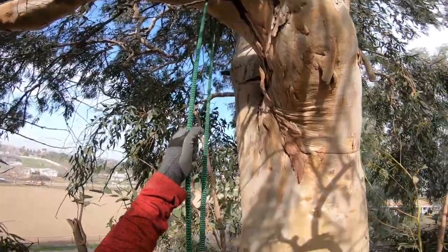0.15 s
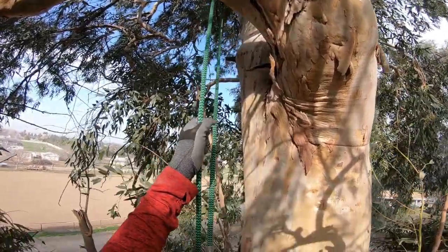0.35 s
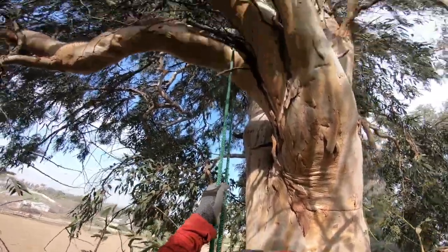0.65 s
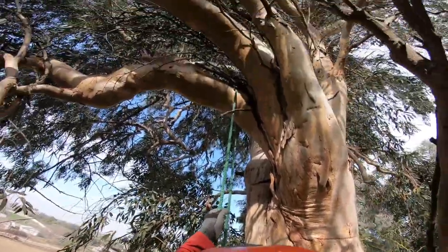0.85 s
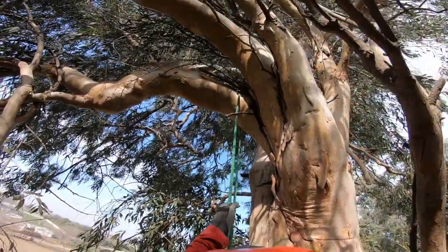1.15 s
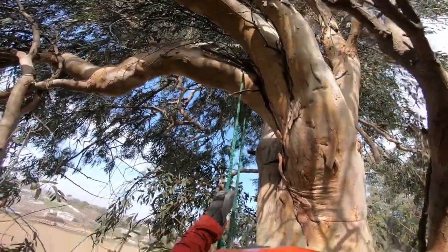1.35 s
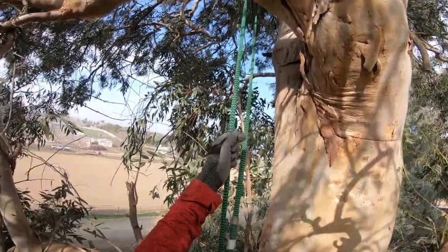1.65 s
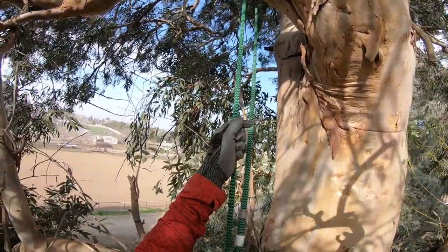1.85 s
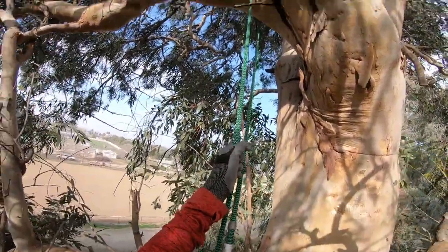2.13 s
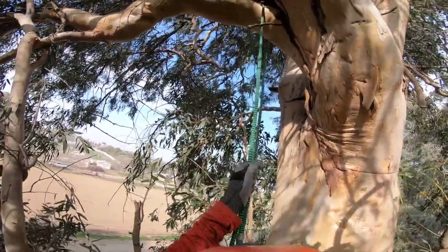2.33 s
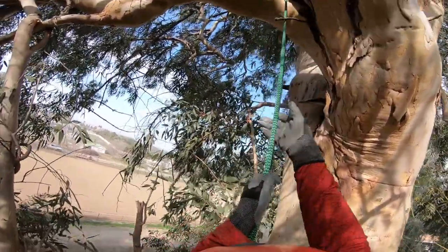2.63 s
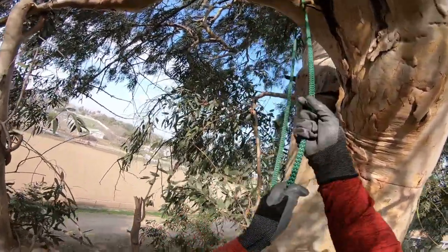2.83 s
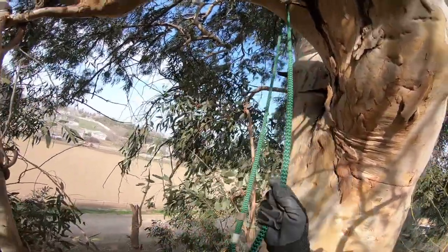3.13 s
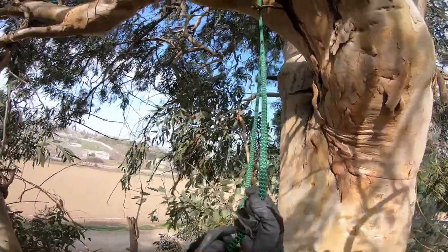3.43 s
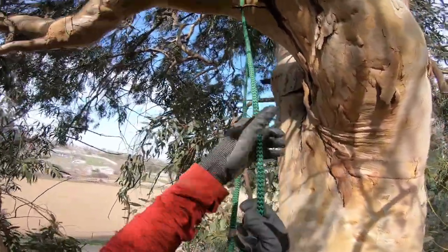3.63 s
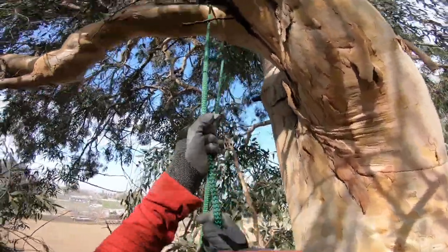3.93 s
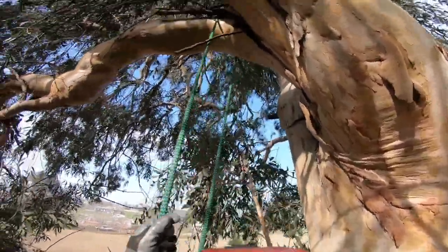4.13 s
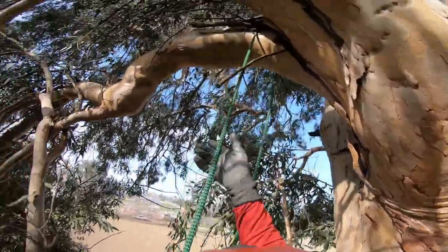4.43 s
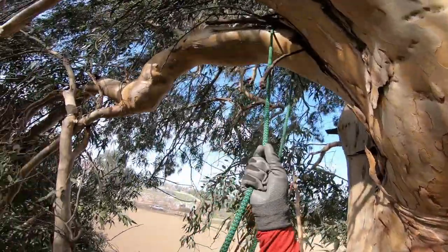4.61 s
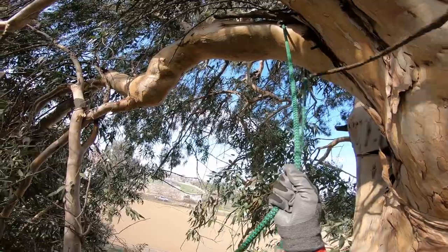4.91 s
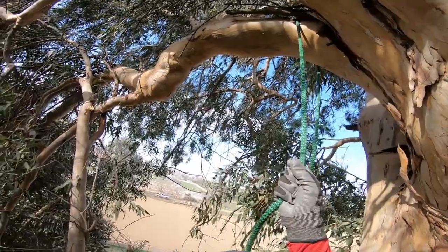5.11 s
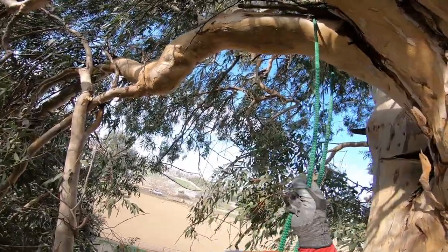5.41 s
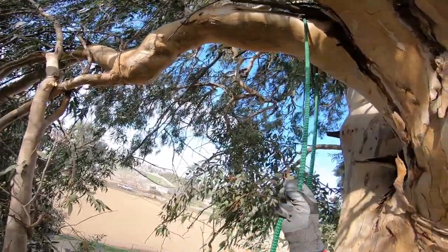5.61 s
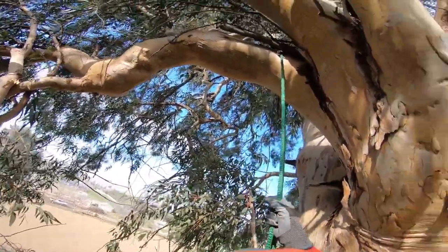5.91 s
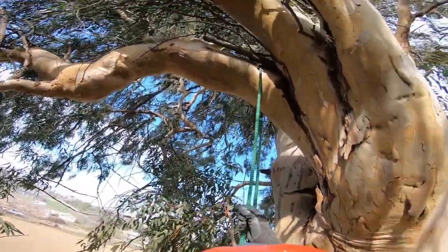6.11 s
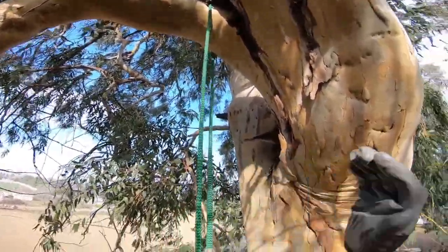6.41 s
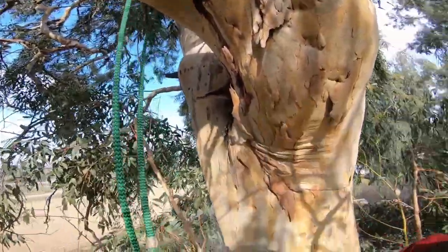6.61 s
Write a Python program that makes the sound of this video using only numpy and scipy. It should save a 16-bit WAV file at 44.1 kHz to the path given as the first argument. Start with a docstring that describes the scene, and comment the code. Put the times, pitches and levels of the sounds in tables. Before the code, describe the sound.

Outdoors, high in a tree, heard from a helmet microphone. A far engine drones throughout, low and slightly wavering, sagging a touch around 3.5 s, over a soft wash of open air. Rope rustles at once; from 0.3 to 0.75 s come coarse glove scrapes, short rasps and quick metal clicks. Then it is calmer: light rubbing, a soft wind thump at 1.1 s and a deeper one near 1.5 s, clicks around 1.6 s and thin, faint rising whistles to 1.9 s. Small ticks scatter from 2.4 to 4 s, with a low thump at 3.66 s. A dense rattle of rope and carabiner follows at 4.1-4.45 s, then a bright clack at 4.8 s. At 5.13 s a hard knock overloads the sound; everything drops and slowly recovers. A strong jerk and clack lands at 5.5 s, then sparse clicks, rustles and a wind thump at 6.6 s, the drone continuing to the end at about 6.8 s.

```python
"""A far engine drones over an open-air wash, and close by a rope jerks at once: rustle of glove and rope.
Place: high in a tree, where a climber works the rope; microphone: a helmet camera with two ports.
The drone is a sum of shaft orders, wash and rustle are shaped noise, metal hardware clicks as decaying modes.
Rasps, wind thumps on the ports and thin far whistles join in. Late on, a hard knock on the housing overloads
the camera, whose gain control drops the whole scene and lets it creep back."""
import sys
import numpy as np
from scipy import signal
from scipy.fft import rfft, irfft
from scipy.io import wavfile
from scipy.ndimage import uniform_filter1d

SR = 44100
rng = np.random.default_rng(int(sys.argv[2]) if len(sys.argv) > 2 else 0)


def to_wav(sig):
    """Store sig (one row per channel, or 1-D mono) as 16-bit WAV at the path in sys.argv[1].

    Samples outside -1..1 are clipped; the rate is SR.
    """
    pcm = np.clip(np.atleast_2d(sig), -1, 1) * 32767
    pcm = np.round(pcm).astype(np.int16)
    wavfile.write(sys.argv[1], SR, pcm.T)  # frames by channels


N = 298027  # samples


def undb(db):
    """Amplitude factor of a level in dB."""
    return 10 ** (np.asarray(db) / 20)


def curves(table):
    """Columns of a time table, one value per sample."""
    s, *columns = np.transpose(table)
    return [np.interp(np.arange(N) / SR, s, c) for c in columns]


def log_interp(hz, table, column):
    """Read a column of a frequency table, its points joined on a log axis."""
    table = np.array(table)
    return np.interp(np.log(hz), np.log(table[:, 0]), table[:, column])


def colour(x, table, column=1):
    """Filter by (f/Hz, level/dB) points."""
    hz = np.arange(len(x) // 2 + 1) * SR / len(x) + 1  # 1 Hz up, to avoid log of zero
    return irfft(rfft(x) * undb(log_interp(hz, table, column)), len(x))


def band(x, hz, width_hz):
    """Steep band-pass around hz: one resonance applied twice."""
    b, a = signal.iirpeak(hz, hz / width_hz, SR)
    return signal.lfilter(b, a, signal.lfilter(b, a, x))


def unit(x):
    """Scale to an RMS of one."""
    return x / np.sqrt(np.mean(x ** 2))


def walk(rate):
    """Random levels held 1 / rate s and slewed twice; spread near 1."""
    hold = int(SR / rate)
    steps = np.repeat(rng.standard_normal(N // hold + 1), hold)
    return 1.606 * uniform_filter1d(uniform_filter1d(steps, hold), hold)[:N]


def ring(hz, t60, rise, phase=0):
    """A quarter second of a struck mode: quick rise, exponential decay of a sine."""
    t = np.arange(SR // 4) / SR
    envelope = (1 - np.exp(-t / rise)) * np.exp(-np.log(1000) * t / t60)
    return envelope * np.sin(2 * np.pi * hz * t + phase)


def slips(rate, spread_db, decay_s, floor):
    """Sudden slips at random moments (rate per second), each dying away, over a steady rub."""
    kicks = (rng.random(N) < rate / SR) * undb(spread_db * rng.standard_normal(N))
    return floor + signal.lfilter([1], [1, -np.exp(-1 / (decay_s * SR))], kicks)


def add(track, s, sound):
    """Mix a sound in at time s."""
    i = int(s * SR)
    track[..., i:i + sound.shape[-1]] += sound[..., :N - i]


# left microphone port against right: f/Hz, level/dB, likeness/0-1
PORT_BALANCE = [(60, 0, 0.97), (201, -0.5, 1), (357, 1.5, 0.93), (594, -3.5, 0.69), (927, -8.5, 0.3),
                (1500, -10, 0.26), (3140, -5, 0), (4970, -1.5, 0.4), (8100, -4, 0), (15000, -2.5, 0)]
LEFT_LAG_S = 0.00022


def ports(right, twin):
    """Left hears the right signal late and shaded, blended with a twin signal where likeness falls."""
    hz = np.arange(N // 2 + 1) * SR / N + 1
    alike = np.clip(log_interp(hz, PORT_BALANCE, 2), 0, 1)
    late = rfft(right) * np.exp(-2j * np.pi * hz * LEFT_LAG_S)
    left = alike * late + np.sqrt(1 - alike ** 2) * rfft(twin)
    return np.array([colour(irfft(left, N), PORT_BALANCE), right])


# far engine speed, sagging once under load: t/s, shaft rate f/Hz
SHAFT_RATE = [(0, 19.9), (0.3, 19.9), (0.5, 19.78), (2.3, 19.77), (3.0, 19.72), (3.5, 19.53), (3.75, 19.58),
              (4.25, 19.85), (4.75, 19.77), (5.9, 19.71), (6.76, 19.76)]
# strong orders fade in and out on the way: t/s, order 10 level/dB, order 20 level/dB, order 21 level/dB
STRONG_ORDERS = [(0, -42, -36.5, -54), (0.3, -36.5, -36, -47.5), (0.8, -37.5, -41.5, -54.5),
                 (1.6, -38.5, -40.5, -60), (2.1, -39, -36.5, -49.5), (2.5, -38, -43.5, -58),
                 (2.95, -37.5, -41.5, -51), (3.45, -53.5, -43, -47.5), (3.75, -39, -41.5, -47.5),
                 (4.1, -47, -38, -45), (4.5, -36.5, -39, -44), (4.8, -40.5, -37, -53.5),
                 (5.4, -41.5, -36.5, -42.5), (5.9, -46, -39.5, -47), (6.76, -43, -36, -44.5)]
# faint orders without slow fades: multiple of shaft rate, level/dB
FAINT_ORDERS = [(8, -57), (11, -55), (12, -59), (19, -56), (30, -52), (31, -59), (40, -56.5)]
LOW_HUM_HZ, LOW_HUM_DB = 79.94, -44.5  # centres of a wandering pitch and level


def drone():
    """Far engine: shaft orders in step, each wavering a little on the way through the air, and a low hum."""
    shaft_hz, = curves(SHAFT_RATE)
    db10, db20, db21 = curves(STRONG_ORDERS)
    turn = 2 * np.pi * np.cumsum(shaft_hz) / SR
    hum_level = undb(LOW_HUM_DB + 2.24 * walk(9))
    hum_hz = LOW_HUM_HZ + 1.05 * walk(6)
    out = hum_level * np.sin(2 * np.pi * np.cumsum(hum_hz) / SR)
    for order, db in [(10, db10), (20, db20), (21, db21)] + FAINT_ORDERS:
        # orders line up into one pressure pulse; higher ones waver more in level
        level = undb(db + (.8 + 0.03 * order) * walk(9))
        out += level * np.cos(round(order) * turn + .3 * walk(8))
    return ports(np.sqrt(2) * out, np.zeros(N))  # sqrt(2) makes the levels RMS


# open-air wash of engine, fields and leaves at the right port: f/Hz, level/dB per Hz
WASH_SPECTRUM = [(32, -66), (50, -61.5), (90, -63), (160, -65), (300, -72.5), (550, -72.5), (850, -71.5),
                 (1300, -72), (2200, -78), (3500, -92), (6000, -100), (8500, -94), (10500, -107.5),
                 (15000, -110)]
# slow drift of the wash, perhaps as the head turns: t/s, bass level/dB, middle level/dB
HEAD_DRIFT = [(0, 1.5, -0.5), (1.3, 0, 0.5), (2.3, -1, -1), (3.3, -1, 0), (4.6, -2, 1.5), (5.5, -2, 0),
              (6.2, 1.5, 0), (6.76, 0, 4)]


def wash():
    """Half-octave bands of far noise that swell and flicker on their own."""
    pair = np.zeros((2, N))
    bass_db, middle_db = curves(HEAD_DRIFT)
    hz = np.arange(N // 2 + 1) * SR / N
    for lo in 25 * 2 ** np.arange(0, 10, .5):
        inside = (hz >= lo) & (hz < lo * np.sqrt(2))
        noise = irfft(rfft(rng.standard_normal((2, N))) * inside, N)
        # the middle drift is strongest at 1700 Hz
        drift_db = bass_db if lo < 150 else middle_db * np.exp(-np.log2(lo / 1700) ** 2)
        pair += noise * undb(drift_db + .9 * walk(1.6) + .9 * walk(12))
    # white noise scaled to unit power per Hz takes the spectrum
    return ports(*(colour(v * np.sqrt(SR / 2), WASH_SPECTRUM) for v in pair))


# strokes of glove or sleeve that swell and fade: start t/s, length t/s, hiss level/dB, scrape level/dB
GLOVE_STROKES = [(0.132, 0.15, -55, -49), (0.279, 0.18, -41, -33), (0.418, 0.22, -41, -38),
                 (0.53, 0.16, -36.5, -31), (0.648, 0.15, -45.5, -56), (0.75, 0.34, -51.5, -65),
                 (1.012, 0.27, -50, -53), (1.539, 0.12, -48.5, -40.5), (1.993, .13, -52, -48),
                 (2.502, 0.6, -54, -54), (2.894, 0.4, -46.5, -49), (3.219, 0.25, -43, -43),
                 (3.435, 0.055, -47, -50), (3.662, 0.03, -48, -47), (3.729, 0.038, -51, -41),
                 (3.47, 0.35, -53.5, -47), (3.95, 0.3, -50.5, -47), (3.772, 0.2, -48.5, -42),
                 (4.188, 0.071, -30.5, -34), (4.231, 0.21, -37.5, -40.5), (4.457, 0.23, -52.5, -49),
                 (4.683, 0.16, -51.5, -47), (5.266, 0.14, -47, -51), (5.6, 0.24, -55, -51),
                 (6.043, 0.42, -46, -46.5), (6.151, 0.08, -38.5, -45), (6.532, 0.13, -70, -50),
                 (6.544, 0.27, -49, -65)]
STROKE_PEAK = 0.42  # share of the length at which a stroke is loudest
# jerks of the rope that start at once and die away: t/s, hiss level/dB, scrape level/dB
ROPE_JERKS = [(0.001, -45.5, -44), (0.294, -39, -32), (0.547, -37, -32), (0.697, -37, -38.5),
              (4.086, -36, -47), (4.794, -21.5, -56), (4.89, -38, -57), (4.987, -33, -62),
              (5.053, -31, -55.5), (5.113, -34, -32.5), (5.28, -39, -51), (5.4925, -20, -26),
              (5.782, -47.5, -38), (5.898, -42, -47)]
# time for a jerk to fall by 60 dB: hiss t/s, scrape t/s
JERK_DECAY = [0.19, 0.23]
JERK_RISE_S = 0.00058
# the rope never lies quite still
IDLE_HISS_DB, IDLE_SCRAPE_DB = -61.5, -53


def handling():
    """Gains of hiss and scrape: a restless floor, swelling strokes and sudden jerks add as power."""
    power = undb([[IDLE_HISS_DB], [IDLE_SCRAPE_DB]] + 0.65 * walk(8.0)) ** 2
    bend = np.log(.5) / np.log(STROKE_PEAK)  # puts the sine's crest at the peak
    for start, length, *db in GLOVE_STROKES:
        part = np.linspace(0, 1, int(length * SR))
        swell = np.abs(np.sin(np.pi * part ** bend)) ** 1.18
        add(power, start, np.outer(undb(db), swell) ** 2)
    t = np.arange(SR // 2) / SR
    for s, *db in ROPE_JERKS:
        decay = np.exp(-np.log(1000) * t / np.array(JERK_DECAY)[:, None])
        fade = (1 - np.exp(-t / JERK_RISE_S)) * decay
        add(power, s, (undb(db)[:, None] * fade) ** 2)
    return np.sqrt(power)


# bright close sounds through the microphone port cavity: f/Hz, relative level/dB
CAVITY_RESPONSE = [(1500, -13.5), (3000, -3), (5000, 1), (7000, 5.5), (8500, 7.5), (9800, 0), (11500, -6.5),
                   (15500, -4)]
# resonances of the scrape in the glove: f/Hz, width f/Hz, relative level/dB
SCRAPE_BANDS = [(2380, 2240, 8.5), (1670, 430, 9), (2620, 400, 2), (1277, 510, 7.5)]


def rustle():
    """Fibres slip in uneven grains: a close hiss through the port cavity and a coarser scrape in the glove."""
    hiss_gain, scrape_gain = handling()
    grains = slips(140, 3.5, .002, 1.6)
    hiss = np.array([unit(colour(v * grains, CAVITY_RESPONSE)) for v in rng.standard_normal((2, N))])
    scrape = np.zeros((2, N))
    for hz, width_hz, db in SCRAPE_BANDS:
        coarse = grains + slips(70, 5.5, .004, .1)
        scrape += undb(db) * band(rng.standard_normal((2, N)) * coarse, hz, width_hz)
    return ports(*(hiss * hiss_gain + unit(scrape) * scrape_gain))


# hardware clicks: t/s, metal level/dB, metal f/Hz, body level/dB, body f/Hz, left minus right level/dB
HARDWARE_CLICKS = [(0.3, -32, 3000, -22, 1350, -24), (0.339, -22, 7100, -25, 567, -33),
                   (0.4673, -43, 2810, -29, 2780, -20), (0.499, -37, 2800, -23, 2660, -30),
                   (0.5295, -31, 8100, -42, 2600, -12), (0.5483, -33, 4730, -22, 1810, -25),
                   (0.578, -31, 8200, -40, 2600, -10), (0.596, -23, 3200, -20, 1410, -33),
                   (0.63, -25.5, 7300, -30, 2720, -17), (0.643, -33, 3350, -17, 1880, -23),
                   (0.702, -36, 6400, -26, 1320, -12), (1.5673, -37.5, 5600, -31, 846, -5),
                   (1.572, -35, 4400, -45, 835, -12), (1.602, -33.5, 4700, -36, 515, -10),
                   (2.403, -54, 3040, -30, 1360, -22), (2.6433, -41.5, 3200, -34, 605, -0.5),
                   (2.72, -43, 2950, -34, 520, -11), (2.731, -36.5, 4700, -43, 895, -8),
                   (2.8364, -27.5, 6700, -24.5, 3780, -2), (3.036, -41, 6400, -48, 900, -1),
                   (3.12, -30, 4340, -36, 820, -4), (3.2166, -42, 4300, -28.5, 990, -8),
                   (3.239, -36, 4730, -30, 2400, -2.5), (3.2632, -34, 2980, -33, 950, -2.5),
                   (3.276, -37, 9700, -35, 965, -6), (3.322, -27.5, 6440, -33, 820, -9),
                   (3.331, -35, 3440, -36, 1510, -5), (3.351, -37, 8200, -30, 2500, -5.5),
                   (3.389, -36.5, 6620, -43, 534, 1), (3.46, -40, 5500, -38, 900, -8),
                   (3.5719, -49, 3200, -21.5, 775, -7.5), (3.587, -29, 2850, -41, 2490, -5),
                   (3.6524, -33, 4730, -32, 1880, -12), (3.706, -34.5, 4730, -32, 925, -11),
                   (3.825, -28, 5100, -32, 990, -7), (3.8562, -64, 3140, -24.5, 670, -16),
                   (3.901, -50, 4000, -27.5, 1530, -4.5), (3.962, -42, 4700, -50, 900, -8),
                   (4.0905, -29.5, 8000, -19, 1070, -17), (4.197, -41, 2200, -21, 775, -20),
                   (4.2015, -43, 2970, -19, 800, -15), (4.2063, -16.5, 8900, -16, 624, -9.5),
                   (4.228, -22, 4670, -16.5, 980, -11), (4.2325, -28, 8700, -42, 990, -6),
                   (4.2598, -18, 9300, -22.5, 1260, -12), (4.2825, -40, 4020, -24, 1210, -13),
                   (4.2856, -33, 8440, -20.5, 744, -6.5), (4.299, -30, 7000, -24, 1220, -19),
                   (4.324, -42, 8200, -26.5, 790, -13), (4.345, -29, 8820, -28, 547, -22),
                   (4.3865, -28, 8040, -42, 530, -14), (4.416, -35, 4750, -43, 1120, -10),
                   (4.4536, -31.5, 2970, -28.5, 1416, 0), (4.7249, -32, 4640, -23.5, 800, -27.5),
                   (4.7918, -11.5, 3420, -20.5, 2175, 2), (4.7926, -11.5, 7450, -22.5, 2170, 0.5),
                   (4.8898, -24, 3970, -22, 570, -1.5), (4.989, -41, 8100, -42, 630, -22),
                   (5.0538, -24.5, 7540, -32, 1570, -13), (5.1153, -28.5, 8050, -19.5, 784, -9),
                   (5.301, -19.5, 2950, -20, 1880, -9), (5.3303, -30, 7930, -26, 685, -18),
                   (5.448, -36.5, 4800, -42, 1402, -9), (5.476, -38, 3500, -27, 1420, -14),
                   (5.4935, -14, 5900, -10.5, 1690, -5), (5.496, -27, 3460, -13, 696, -8),
                   (5.503, -20.5, 2200, -8.5, 1110, -11), (5.627, -42, 5600, -34, 540, -4),
                   (5.683, -42, 5570, -40, 530, 3), (5.728, -30.5, 2870, -30.5, 553, -3),
                   (5.777, -50, 3020, -25, 2040, -20), (5.784, -43, 3000, -18.5, 1860, -24),
                   (5.8995, -37, 3050, -27, 795, -11), (5.973, -52, 3200, -25, 1170, -29),
                   (6.077, -42, 9800, -26.5, 780, -4), (6.116, -34, 8150, -45, 520, -16)]
# carabiner modes: f/Hz, relative level/dB, time to fall by 60 dB t/s
CARABINER_MODES = [(2180, -6, .02), (3120, -4, .025), (3400, -1, .028), (4050, 0, .029), (4700, -2, .018),
                   (5750, -4, .02), (6400, -3, .015), (7150, -3, .015), (8180, -5, .025), (8950, -2, .02),
                   (9750, -5, .015), (12200, 1, .01)]
NEAR_DB_PER_OCTAVE = 28  # how fast modes weaken away from the click's pitch
LEFT_TURN_RAD = 1.3  # phase lead or lag of each mode at the left port
BODY_CYCLES = 36  # cycles in which the dull body falls by 60 dB
METAL_SHADE_DB = -18.5  # deepest shading of the metal at the left port


def carabiner(metal_hz, mix_db, left_turns):
    """Metal modes of one click: the place of the blow favours modes close to its pitch."""
    metal = 0
    for k, (hz, db, t60) in enumerate(CARABINER_MODES):
        mode_db = db + 1.5 * mix_db[k] - NEAR_DB_PER_OCTAVE * abs(np.log2(hz / metal_hz))
        # neighbouring modes start in opposite sense
        metal = metal + undb(mode_db) * ring(hz, t60, .0004, np.pi * k + left_turns[k])
    return metal


def clicks():
    """Each click: a crack with a short noisy tail, the metal modes near its pitch, a dull body ring."""
    out, t = np.zeros((2, N)), np.arange(SR // 4) / SR
    shape = (1 - np.exp(-t / .0004)) * (np.exp(-t / 0.0016) + undb(-16) * np.exp(-t / .014))
    for s, metal_db, metal_hz, body_db, body_hz, pan_db in HARDWARE_CLICKS:
        mix_db, side = rng.standard_normal((2, len(CARABINER_MODES)))
        shared = rng.standard_normal(len(t))
        for ch, shade_db in enumerate([pan_db, 0]):  # left, right
            # each mode reaches the left port early or late in phase
            metal = carabiner(metal_hz, mix_db, (1 - ch) * LEFT_TURN_RAD * np.sign(side))
            noise = shared + 1.5 * rng.standard_normal(len(t))
            pitched = unit(band(noise, metal_hz, .45 * metal_hz))
            crack = (.65 * unit(colour(noise, CAVITY_RESPONSE)) + pitched) * shape
            thud = unit(band(noise, 1400, 2440)) * shape
            body = 0.81 * ring(body_hz, BODY_CYCLES / body_hz, 0.00029) + 0.97 * thud
            metal_gain = undb(metal_db + max(shade_db, METAL_SHADE_DB))
            add(out[ch], s, metal_gain * (1.19 * metal + 0.94 * crack))
            # the shaded port hears the body later
            body_lag_s = LEFT_LAG_S * np.clip(-shade_db / 7, 0, 1)
            add(out[ch], s + body_lag_s, undb(body_db + shade_db) * body)
    return out


# the close glove rasps on the weave of the rope: start t/s, length t/s, f/Hz, level/dB before its envelope
WEAVE_RASPS = [(0.36, 0.087, 2600, -39), (0.467, 0.033, 2650, -34.5), (0.492, 0.059, 2650, -32.5),
               (0.552, 0.028, 2920, -33.5), (4.214, 0.014, 8200, -26), (4.229, 0.012, 8500, -28),
               (4.2575, 0.0078, 8870, -22), (4.306, 0.023, 8000, -36.5)]
RASP_WIDTH_HZ = 420


def rasps():
    """Quick stick-slip kicks ring one narrow resonance; sudden start, fading end."""
    out = np.zeros((2, N))
    kicks = rng.standard_normal((2, N)) * slips(300, 4, .001, .1)
    for start, length, hz, db in WEAVE_RASPS:
        part = np.linspace(0, 1, int(length * SR))
        i = int(start * SR)
        rasp = unit(band(kicks[:, i:i + len(part)], hz, RASP_WIDTH_HZ))
        add(out, start, undb(db) * rasp * np.sin(np.pi * np.sqrt(part)))
    return ports(*out)


# wind thumps at the microphone ports: t/s, left level/dB, right level/dB, f/Hz
WIND_THUMPS = [(1.075, -26, -55, 288), (1.466, -16.5, -49, 78.5), (3.66, -15.5, -23, 51.3),
               (6.615, -50, -16, 100)]


def wind():
    """Single gusts thump mainly on one port, a low decaying ring of opposite sign at the other."""
    out = np.zeros((2, N))
    for s, left_db, right_db, hz in WIND_THUMPS:
        add(out, s, np.outer([undb(left_db), -undb(right_db)], ring(hz, 0.14, 0.0025)))
    return out


# thin whistles, likely a far bird: start t/s, end t/s, from f/Hz, to f/Hz, level/dB
FAR_WHISTLES = [(1.538, 1.566, 5250, 5200, -58.5), (1.655, 1.825, 4660, 4990, -61),
                (1.77, 1.918, 4800, 5040, -58.5), (4.66, 4.717, 4730, 4900, -59),
                (4.735, 4.78, 4950, 5080, -59), (6.33, 6.48, 4800, 4950, -66)]


def whistles():
    """Near-sine glides, mostly rising, that swell in and stop quickly, alike at both ports."""
    out = np.zeros(N)
    for start, end, from_hz, to_hz, db in FAR_WHISTLES:
        part = np.arange(int((end - start) * SR)) / ((end - start) * SR)
        flutter_hz = 18 * walk(120)[:len(part)]
        glide_hz = from_hz + (to_hz - from_hz) * part ** .8
        phase = 2 * np.pi * np.cumsum(flutter_hz + glide_hz) / SR
        swell = np.sin(np.pi * part ** 2) ** .7
        add(out, start, undb(db) * np.sqrt(2) * swell * np.sin(phase))
    return np.outer([1, 1], out * undb(1.5 * walk(35)))


# knocks on the microphone housing: t/s, level/dB
HOUSING_KNOCKS = [(5.1096, -33.5), (5.12, -14), (5.1313, 8)]
# housing modes: f/Hz, left relative level/dB, right relative level/dB, time to fall by 60 dB t/s
HOUSING_MODES = [(1320, 5.5, 5, 0.015), (1674, -11, -4, 0.017), (315, -17, -28, 0.071),
                 (92.5, -45.5, -27, 0.31), (3630, -38, 0.5, 0.0053), (5280, -38.5, -7, 0.0069)]
KNOCK_LAG_S = 0.00038


def knocks():
    """The blow reaches the left port about half a main-mode cycle later, so the channels nearly oppose."""
    out = np.zeros((2, N))
    for s, db in HOUSING_KNOCKS:
        for hz, left_db, right_db, t60 in HOUSING_MODES:
            add(out[0], s + KNOCK_LAG_S, undb(db + left_db) * ring(hz, t60, 0.0012))
            add(out[1], s, undb(db + right_db) * ring(hz, t60, 0.0009))
    return out


def scene():
    """Far engine and wash, close rope work, wind, far whistles and the knock, summed at the two ports."""
    return drone() + wash() + rustle() + clicks() + rasps() + wind() + whistles() + knocks()


def duck(peak_db, top_db, depth, db_per_s, attack_s):
    """Gain that drops with peaks over top_db and climbs back at a steady rate."""
    climb = db_per_s * np.arange(N) / SR
    cut = np.maximum.accumulate(depth * np.maximum(peak_db - top_db, 0) + climb) - climb
    size = int(attack_s * SR)
    return undb(-uniform_filter1d(cut, size, origin=(size - 1) // 2))


# microphone roll-off behind the housing: f/Hz, level/dB
MICROPHONE_RESPONSE = [(28, -6), (42, 0.5), (9600, 0.5), (10600, -7), (13000, -10.5), (15500, -20)]
TOP_HZ = 16200


def record(dry):
    """Microphone colour, slow gain control on all, a quicker limiter above the bass, overload, top cut."""
    dry = np.array([colour(v, MICROPHONE_RESPONSE) for v in dry])
    peak_db = 20 * np.log10(np.abs(dry).max(axis=0) + 1e-9)
    bass = signal.sosfiltfilt(signal.butter(3, 290, fs=SR, output="sos"), dry)
    upper = (dry - bass) * duck(peak_db, -7.5, 1.31, 87.5, 0.012)
    level = (bass + upper) * duck(peak_db, -0.4, 1.553, 6.33, 0.015)
    overloaded = np.clip(level, -.96, .96)
    return signal.sosfilt(signal.ellip(8, .2, 80, TOP_HZ, fs=SR, output="sos"), overloaded)


dry = scene()
out = record(dry)
to_wav(out)
```